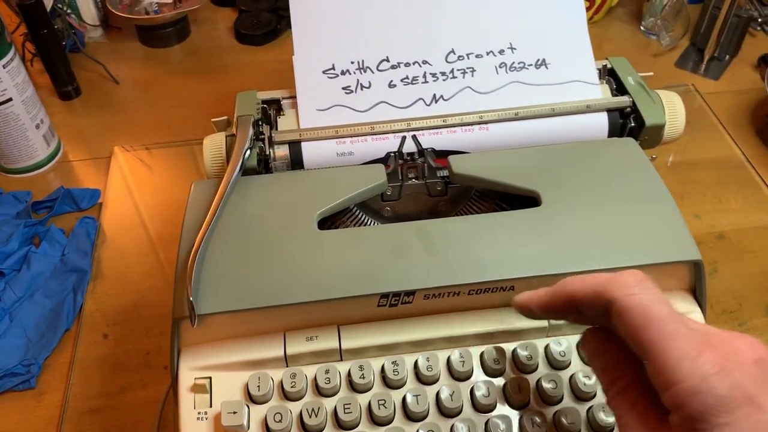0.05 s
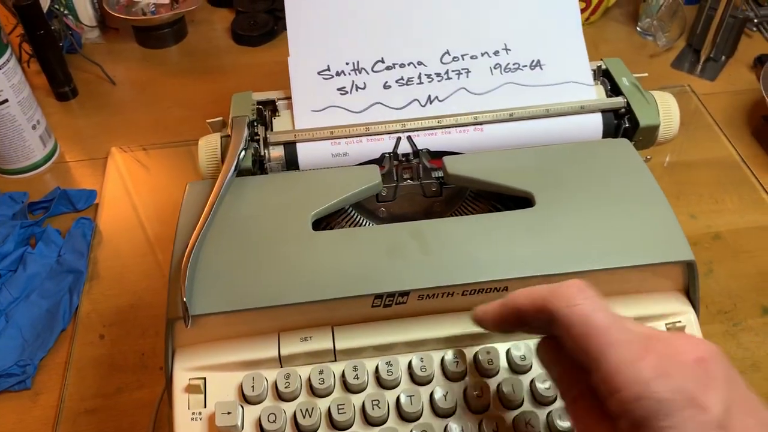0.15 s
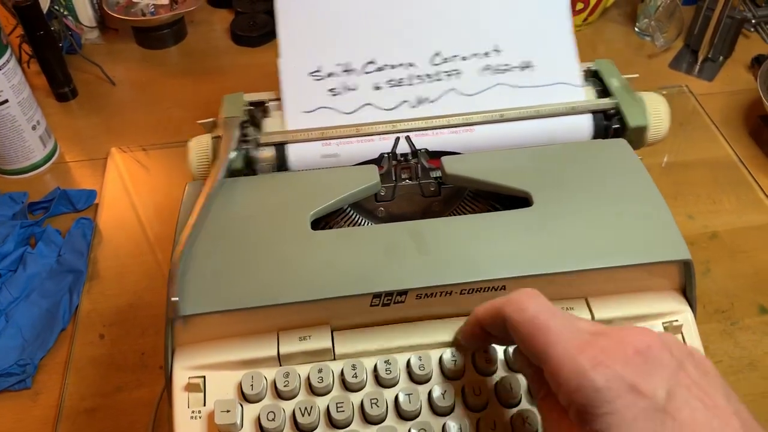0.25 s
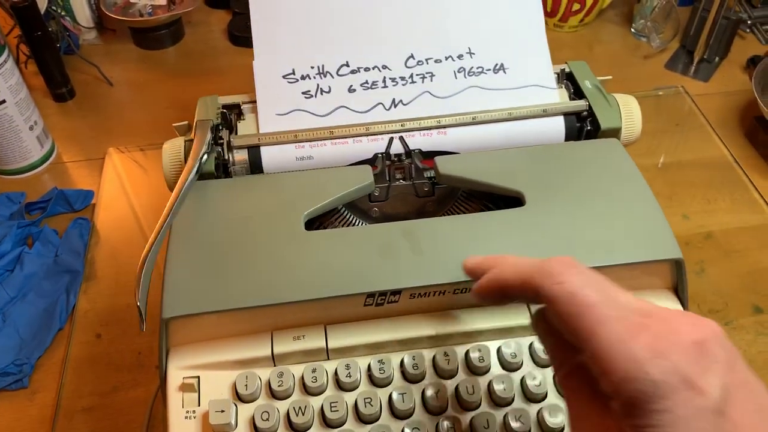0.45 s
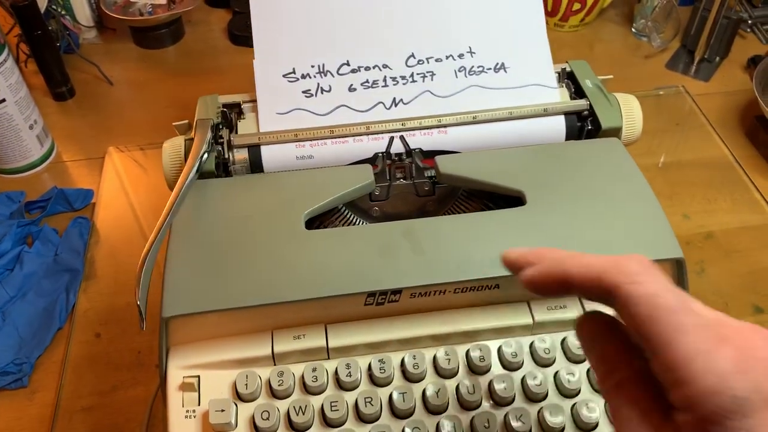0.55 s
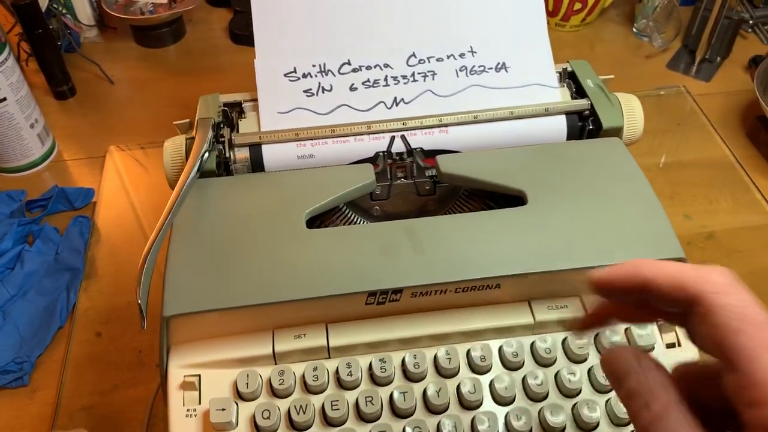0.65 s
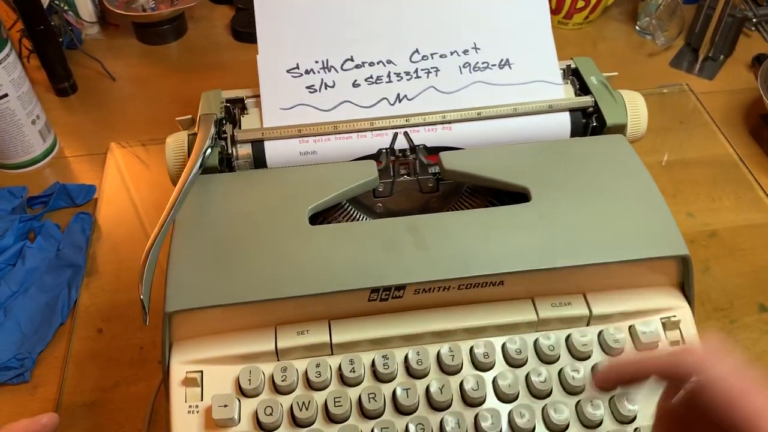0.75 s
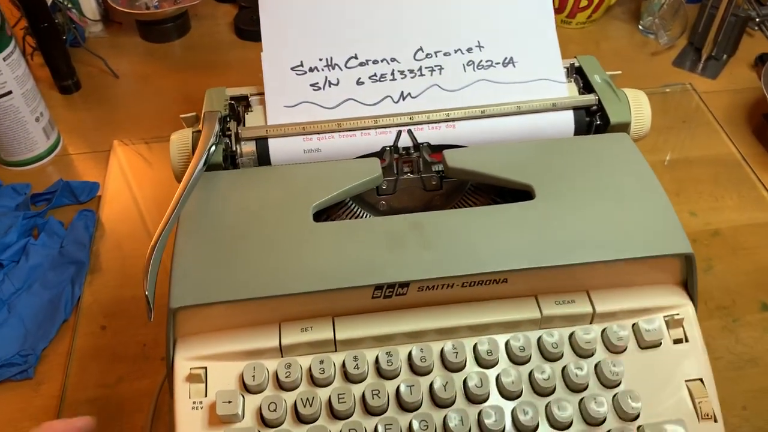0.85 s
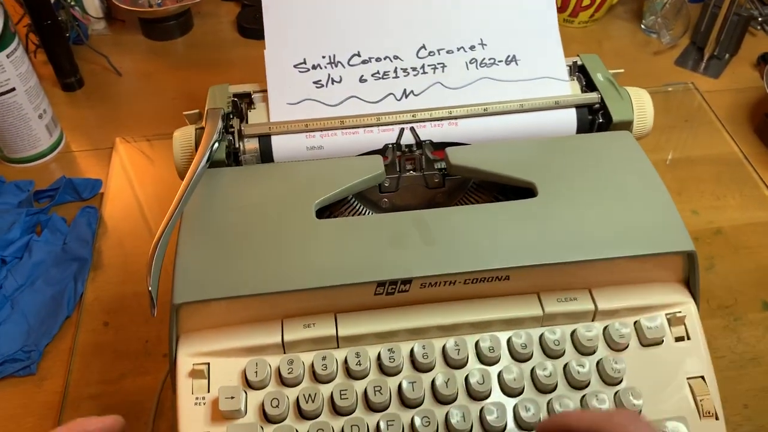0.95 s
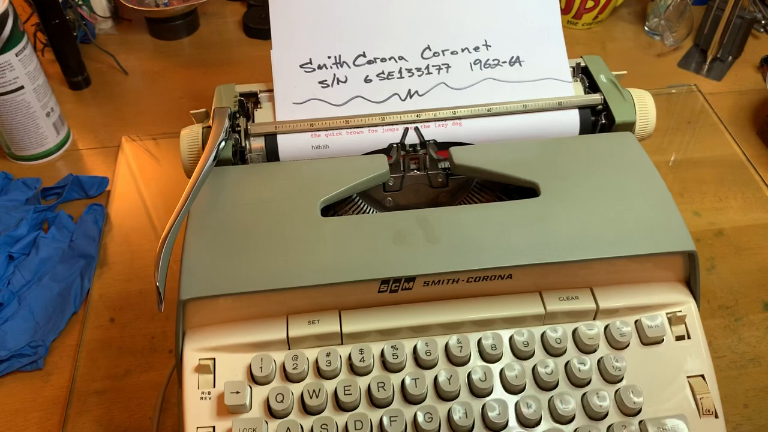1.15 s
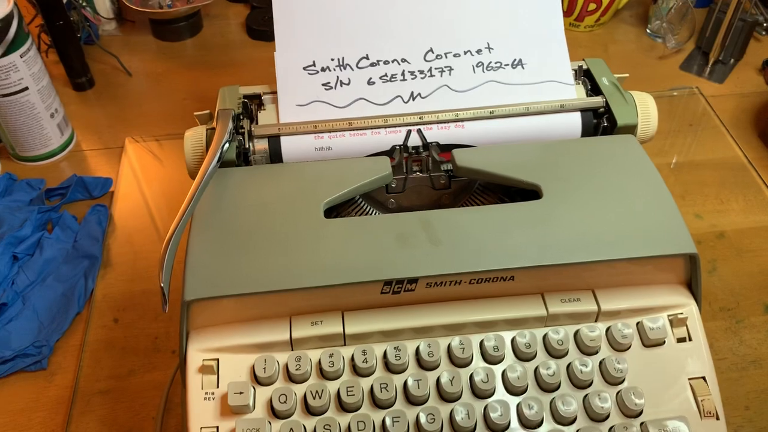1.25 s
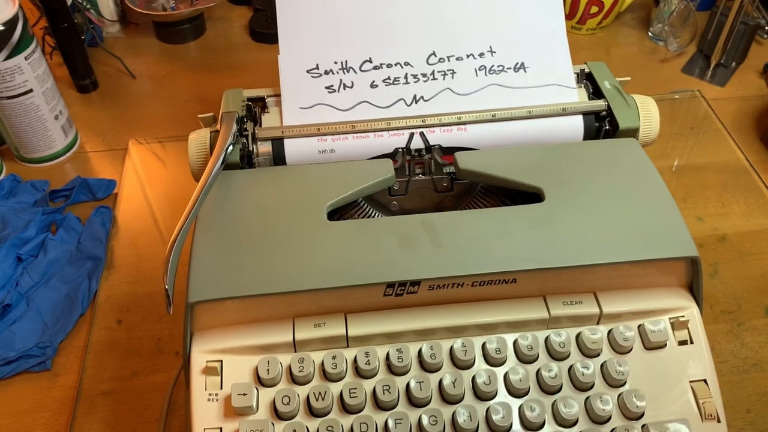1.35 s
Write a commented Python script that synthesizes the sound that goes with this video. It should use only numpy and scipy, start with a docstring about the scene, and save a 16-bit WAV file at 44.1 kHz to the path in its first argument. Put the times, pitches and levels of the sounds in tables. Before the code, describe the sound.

One electric typewriter keystroke clacks sharply over the motor's low idling hum.

```python
"""An electric typewriter idles on a workshop bench, close by: its motor hums and its drive rubs and hisses.
A hand bumps the keyboard and one key is struck. The type bar is flung at the platen and falls back;
each impact excites free vibration of the metal parts, and the room reverberates briefly. The carriage
then jumps one step, rattles and shakes the bench. Light key clicks follow, and the motor hums on."""
import sys
import numpy as np
from scipy import signal
from scipy.fft import rfft, irfft
from scipy.io import wavfile

SR = 44100
rng = np.random.default_rng(int(sys.argv[2]) if len(sys.argv) > 2 else 0)


def to_wav(sig):
    """Store sig (one row per channel, or 1-D mono) as 16-bit WAV at the path in sys.argv[1].

    Samples outside -1..1 are clipped; the rate is SR.
    """
    pcm = np.clip(np.atleast_2d(sig), -1, 1) * 32767
    pcm = np.round(pcm).astype(np.int16)
    wavfile.write(sys.argv[1], SR, pcm.T)  # frames by channels


N = 61739

# Motor hum and belt whine. Each row: frequency in Hz, level in dB, wavering share of the amplitude.
MOTOR_TONES = [(61.3, -69.5, 0.19), (119.95, -46.5, 0.14), (237, -66, 0.5), (293, -69, 0.29),
               (354, -69, 0.62), (519.8, -57.5, 0.45), (1028, -73, 0.89)]
# Housing resonances. Each row: centre in Hz, half width in Hz, level in dB.
HOUSING_BANDS = [(852, 45, -65), (994, 52, -71.5), (1187, 150, -67.5)]
# Spectra of the drive's rush and the belt's hiss. Each row: frequency in Hz, relative density in dB.
DRIVE_SPECTRUM = [(20, -30.5), (38, 0.5), (60, 7), (90, -3), (160, -5), (280, -6), (400, -4), (520, -1),
                  (680, -10.5), (900, -14.5), (1250, -19.5), (1700, -20), (2500, -30.5), (4000, -39.5),
                  (6000, -43.5), (10000, -45), (16000, -55)]
BELT_SPECTRUM = [(300, -23.5), (1000, 3), (2000, -7), (3600, -9), (6000, -32.5), (15000, -30)]
# Envelopes of the running sounds. Each row: time in seconds, gain in dB.
HUM_ENVELOPE = [(0, -4), (.3, 0.5), (.5, -5), (.62, 1.5), (.85, 1), (1.1, 0), (1.4, 1.5)]
DRIVE_ENVELOPE = [(0, -54.5), (.22, -53.5), (.5, -51), (.7, -54.5), (1.0, -53.5), (1.4, -55)]
BELT_ENVELOPE = [(0, -96), (.3, -76.5), (0.601, -69.5), (1.4, -70)]

# Impacts on each part. Each row: start in seconds, level in dB, factor on the decay time.
BUMP_HITS = [(0.2290, -38, 0.6), (1.1060, -53, 1.03)]
LINKAGE_HITS = [(0.2355, -28, 1.0), (0.2380, -20.5, 1.0), (0.2402, -20.5, 0.9), (0.2468, -27, 0.7)]
PAWL_HITS = [(0.2375, -23.5, 3.5), (0.3337, -16, 1.2), (0.3603, -19.5, 0.76), (0.6030, -60.5, 15),
             (0.7220, -67, 4)]
BAR_HITS = [(0.2385, -21.5, 0.92), (0.2467, -17.5, 0.6), (0.2490, -25.5, 0.97), (0.2752, -27.5, 0.74),
            (0.2980, -48, 0.77)]
LEVER_HITS = [(0.2430, -29.5, 0.99), (0.2755, -36, 0.36), (0.2950, -40.5, 2), (0.3590, -32, 0.68),
              (0.3950, -40, 0.44)]
CARRIAGE_HITS = [(0.3345, -24, 0.8), (0.3372, -18.5, 0.9), (0.3400, -22, 1.2), (0.3470, -24.5, 1.2),
                 (0.3605, -31, 0.81), (0.3720, -30, 1.3), (0.3830, -43.5, 1.6), (0.3930, -36, 1.2)]
KEY_HITS = [(0.6020, -49, 1.76), (0.6130, -54, 2.35), (0.6550, -64, 3.7)]
TICK_HITS = [(0.7220, -77, 3.6), (1.0850, -52, 0.76)]
# Spectra of those impacts. Each row: frequency in Hz, relative density in dB.
BUMP_SPECTRUM = [(30, -9.5), (65, 0), (130, -9.5), (240, -4), (400, -23.5), (900, -28.5), (2000, -9),
                 (4000, -30), (8000, -49.5)]
LINKAGE_SPECTRUM = [(80, -25.5), (250, -15), (600, 6.5), (1500, -7.5), (3500, -0.5), (5000, 5), (7500, -11),
                    (10000, -7), (13500, -6), (16000, -13)]
PAWL_SPECTRUM = [(500, -25), (4000, -22), (7000, -13), (9800, 3.5), (13500, 0.5), (16000, -10.5)]
BAR_SPECTRUM = [(60, -32), (140, -12), (250, -1.5), (490, 0.5), (640, -1), (850, 0.5), (1250, -0.5),
                (1650, -5), (2050, 1), (2700, 1), (3600, -12.5), (5000, -13.5), (8000, -18.5), (15000, -27)]
LEVER_SPECTRUM = [(500, -24), (2200, -17.5), (3200, -2.5), (4300, -1.5), (5500, -11), (8000, -8.5),
                  (15000, -31)]
CARRIAGE_SPECTRUM = [(60, -22), (130, -0.5), (250, 0.5), (350, -1.5), (500, 3.5), (660, -5), (880, 2),
                     (1100, -5.5), (1600, -5.5), (2000, -4), (3000, -6.5), (3750, -7), (4700, -8.5),
                     (7000, -7.5), (9000, -12), (10300, -5.5), (13000, -4), (16000, -16.5)]
KEY_SPECTRUM = [(100, 0), (500, -3), (950, 9), (1600, -2.5), (3000, 0), (5000, -8.5), (8000, -5.5),
                (14000, -15)]
TICK_SPECTRUM = [(200, -13), (2000, 10.5), (5000, -5), (8000, 14.5), (14000, 0)]
# Damping of parts and room. Each row: frequency in Hz, T60 (time to fall 60 dB) in seconds.
METAL_T60 = [(100, 0.36), (400, 0.11), (1500, 0.079), (4000, 0.018), (9000, 0.13), (15000, .035)]
CARRIAGE_T60 = [(100, 0.033), (400, 0.027), (1500, 0.094), (4000, 0.14), (9000, 0.068), (15000, 0.021)]
TICK_T60 = [(100, 0.034), (3000, 0.07), (15000, 0.0066)]
ROOM_T60 = [(100, 0.78), (500, 0.53), (1500, 0.3161), (3500, 0.4537), (7000, 0.26), (13000, 0.2646)]
# Strength of the reverberation. Each row: frequency in Hz, gain in dB.
ROOM_GAIN = [(100, -2.5), (400, -10), (640, -10), (1500, -5.5), (4000, -14.5), (8000, -6), (14000, -16.5)]
# Distinct modes of the parts. Each row: frequency in Hz, level relative to the hit in dB, T60 in seconds.
FRAME_RESONANCES = [(297, -19, .3), (474, -18, .28), (502, -18, .28), (566, -18, .24), (850, -18, .2),
                    (1100, -21, .3), (1208, -18, .3), (1502, -26, .24), (2012, -17, .28), (2181, -17, .28),
                    (2460, -20, .15), (2640, -17, .12), (3034, -20, .28), (3420, -26, .2), (3700, -26, .2)]
CARRIAGE_RESONANCES = [(228, -22, .3), (263, -22, .3), (401, -22, .3), (484, -17, .2), (1106, -24, .3),
                       (1335, -21, .26), (2089, -22, .22), (2611, -20, .22), (3245, -16, .2),
                       (3692, -19, .15), (4194, -16, .18), (4650, -22, .17), (5992, -22, .18),
                       (6627, -21, .2), (7090, -20, .1), (8080, -21, .13)]
KEY_RESONANCES = [(792, -12, .2), (952, -6, .16), (1166, -15, .22), (1394, -10, 0.3), (1915, -12, 0.39),
                  (2454, -17, 0.27), (3240, -23, 0.15)]
# Hard contacts. Each row: start in seconds, level in dB, frequency in Hz, time to peak in seconds.
SNAP_PULSES = [(0.244, -21.5, 1780, 0.0003), (0.2467, -8.5, 2474, 0.00021), (0.2472, -12.5, 5340, 0.00022),
               (0.2494, -23.5, 677, 0.0005), (0.2753, -36, 2166, 0.0024), (0.3355, -23.5, 3740, 0.0017),
               (0.3375, -26.5, 504, 0.006), (0.3603, -30, 4160, 0.0057), (0.603, -52, 945, 0.0057)]
# Rocking on the bench. Each row: start in seconds, level in dB, frequency in Hz.
BENCH_THUMPS = [(0.352, -27.5, 66.2), (0.443, -35.5, 62.4), (1.134, -51, 234.3)]

# Likeness at the two microphones. Each row: frequency in Hz, left-right correlation.
NEAR_COHERENCE = [(100, .98), (500, .92), (1200, .6), (3000, .15), (6500, .45), (8500, .8), (10000, .92),
                  (15000, .88)]
FAR_COHERENCE = [(100, 0.99), (300, .9), (600, 1), (1300, 0.33), (2500, 0.015), (7000, 0.33), (8700, 0.47),
                 (14000, 0.908)]
# Stereo balance. Each row: frequency in Hz, left minus right in dB.
MIC_BALANCE = [(50, -2.5), (250, -0.7), (550, 0.5), (900, 1.55), (2800, 1.5), (5700, -1.5), (9000, 0)]
# Microphone response. Each row: frequency in Hz, gain in dB.
MIC_RESPONSE = [(7000, -2), (8500, 1), (10500, -0.5), (12000, -2.5), (14300, 5.5), (15400, -3),
                (16300, -14.5)]

FLAT_SPECTRUM = [(1, 0)]
LN_1000 = np.log(1000)  # a fall of 60 dB in nepers
TIME, FREQS = np.arange(N) / SR, np.fft.rfftfreq(N, 1 / SR)


def amp(db):
    """Amplitude grows tenfold for every 20 dB."""
    return 10 ** (np.asarray(db) / 20)


def unit_rms(x):
    """Normalisation to unit mean power."""
    return x / np.sqrt(np.mean(x ** 2) + 1e-20)


def curve_at(points, hz):
    """Interpolation on a logarithmic frequency axis."""
    freqs, values = np.transpose(points)
    return np.interp(np.log(hz + 1), np.log(freqs + 1), values)


def envelope(points):
    """Interpolation in decibels: the gain moves exponentially between points."""
    return amp(np.interp(TIME, *np.transpose(points)))


def add(mix, start, sound):
    """Superposition: a sound adds to the mix from its start in seconds."""
    part = mix[:, max(round(start * SR), 0):][:, :sound.shape[-1]]
    part += sound[..., :part.shape[1]]


def noise_pair(coherence, spectrum, size):
    """Partial coherence: shared and opposed noise set the likeness of the two channels."""
    hz = np.fft.rfftfreq(size, 1 / SR)
    mid, side = rfft(rng.standard_normal((2, size)))
    same = np.clip(curve_at(coherence, hz), -1, 1)
    mid, side = mid * np.sqrt(1 + same), side * np.sqrt(1 - same)
    return unit_rms(irfft(np.array([mid + side, mid - side]) * amp(curve_at(spectrum, hz)), size))


def damp(x, decay, stretch=1):
    """Frequency-dependent damping: each band decays exponentially at its own rate."""
    size = x.shape[-1]
    hz, t = np.fft.rfftfreq(size, 1 / SR), np.arange(size) / SR
    centres, t60s = np.transpose(decay)
    spectrum, out = rfft(x), np.zeros_like(x)
    for weights, t60 in zip(np.eye(len(decay)), t60s):
        band = irfft(spectrum * curve_at(np.c_[centres, weights], hz), size)
        out += band * np.exp(-LN_1000 * t / (t60 * stretch))
    return out


def equalise(x, response):
    """Minimum-phase filtering: the Hilbert transform of the log gain gives a causal phase."""
    log_gain = np.log(amp(curve_at(response, abs(np.fft.fftfreq(4096, 1 / SR)))))
    taps = np.fft.ifft(np.exp(np.conj(signal.hilbert(log_gain)))).real
    return signal.fftconvolve(x, taps[None, :len(taps) // 2], axes=1)[:, :N]


def swell(depth_db, cutoff_hz=8):
    """Random amplitude modulation: low-passed noise moves a gain by depth_db rms."""
    slow = irfft(rfft(rng.standard_normal(N)) / (1 + (FREQS / cutoff_hz) ** 4), N)
    return amp(depth_db * unit_rms(slow))


def motor(waver_hz=16):
    """Narrow-band modulation makes mains hum and whine waver, over the rush of belts and roller."""
    hz, hum = np.fft.fftfreq(N, 1 / SR), np.zeros(N)
    for pitch, db, share in MOTOR_TONES:
        drift = np.fft.ifft(np.exp(2j * np.pi * rng.random(N)) / (1 + (hz / waver_hz) ** 2))
        swing = np.sqrt(1 - share ** 2) + share * drift / drift.std()
        hum += amp(db) * unit_rms((swing * np.exp(2j * np.pi * pitch * TIME)).real)
    rush = noise_pair(FAR_COHERENCE, DRIVE_SPECTRUM, N)
    return hum * envelope(HUM_ENVELOPE) + rush * envelope(DRIVE_ENVELOPE)


def housing():
    """Forced vibration: the drive rubs unevenly, and each housing resonance swells on its own."""
    out = np.zeros((2, N))
    for centre, width, db in HOUSING_BANDS:
        friction = noise_pair(FAR_COHERENCE, FLAT_SPECTRUM, N)
        band = irfft(rfft(friction) / (1 + ((FREQS - centre) / width) ** 4), N)
        out += amp(db) * unit_rms(band * swell(depth_db=4))
    return out * envelope(HUM_ENVELOPE)


def belt():
    """Modulated broadband noise: the belt's faint hiss flutters and grows after the stroke."""
    gain = swell(depth_db=1.8) * envelope(BELT_ENVELOPE)
    return gain * noise_pair(FAR_COHERENCE, BELT_SPECTRUM, N)


def impacts(hits, spectrum, decay, rise_s=0.0006):
    """Impact excitation: the modes of small parts lie so densely that they ring as decaying noise."""
    out, onset = np.zeros((2, N)), 1 - np.exp(-TIME / rise_s)
    for start, db, stretch in hits:
        ring = damp(noise_pair(NEAR_COHERENCE, spectrum, size=8192), decay, stretch)
        add(out, start, amp(db) * ring * onset[:ring.shape[1]])
    return out


def hand_bumps():
    """A soft impact excites mainly low frequencies: the hand bumps the keyboard."""
    return impacts(BUMP_HITS, BUMP_SPECTRUM, METAL_T60)


def room(x, delay_s=0.0065, rise_s=0.016):
    """Diffuse reverberation: convolution with a noise tail that lasts longest in the bass."""
    t = np.arange(SR) / SR
    tail = damp(noise_pair(FAR_COHERENCE, FLAT_SPECTRUM, size=SR), ROOM_T60)
    tail *= np.clip((t - delay_s) / rise_s, 0, 1)
    tail /= np.linalg.norm(tail[0])
    return equalise(signal.fftconvolve(x, tail, axes=1)[:, :N], ROOM_GAIN)


def type_bar():
    """Momentum transfer: the linkage catches and flings the bar, which hits the platen, then its rest."""
    linkage = impacts(LINKAGE_HITS, LINKAGE_SPECTRUM, METAL_T60)
    return linkage + impacts(BAR_HITS, BAR_SPECTRUM, METAL_T60)


def pawls():
    """Hard impacts excite high frequencies: pawls and latches click as they engage and rebound."""
    return impacts(PAWL_HITS, PAWL_SPECTRUM, TICK_T60)


def ringing(hits, modes):
    """Free vibration: each hit starts a part's distinct modes as damped sinusoids of random phase."""
    out, t = np.zeros((2, N)), np.arange(SR // 2) / SR
    for hz, mode_db, t60 in modes:
        # The phase gap between the channels has the coherence as its cosine.
        half_gap = np.arccos(np.clip(curve_at(NEAR_COHERENCE, hz), -1, 1)) * rng.choice([-.5, .5])
        phase = 2 * np.pi * hz * t + np.array([[half_gap], [-half_gap]])
        ring = np.exp(1j * phase - LN_1000 * t / t60)
        for (start, hit_db, _), turn in zip(hits, rng.random(len(hits))):
            add(out, start, amp(hit_db + mode_db) * (ring * np.exp(2j * np.pi * turn)).real)
    return out


def levers():
    """Repeated collision: loose levers rattle in the type basket."""
    return impacts(LEVER_HITS, LEVER_SPECTRUM, CARRIAGE_T60)


def snaps():
    """A brief pulse has a broad spectrum: type slug, carriage stop and key ping or knock on contact."""
    out, t = np.zeros((2, N)), np.arange(SR // 20) / SR
    for start, db, hz, peak_s in SNAP_PULSES:
        pulse = t / peak_s * np.exp(1 - t / peak_s)
        add(out, start, amp(db) * pulse * np.sin(2 * np.pi * hz * t))
    return out


def carriage():
    """Collision and rebound: the carriage hits its stop and rattles."""
    return impacts(CARRIAGE_HITS, CARRIAGE_SPECTRUM, CARRIAGE_T60)


def bench(rise_s=0.0095, t60=0.26):
    """Damped oscillation: the machine rocks on the bench in low, swelling thumps."""
    out, t = np.zeros((2, N)), np.arange(SR // 2) / SR
    shape = (1 - np.exp(-(t / rise_s) ** 2)) * np.exp(-LN_1000 * t / t60)
    for start, db, hz in BENCH_THUMPS:
        add(out, start, amp(db) * shape * np.sin(2 * np.pi * hz * t))
    return out


def keys():
    """Weak impacts: key and latch click as they reset, and tiny sharp ticks follow."""
    return impacts(KEY_HITS, KEY_SPECTRUM, CARRIAGE_T60) + impacts(TICK_HITS, TICK_SPECTRUM, TICK_T60)


def scene():
    """Superposition of the impacts, their reverberation, the ringing parts and the running drive."""
    hits = type_bar() + carriage() + pawls() + keys() + levers() + snaps() + hand_bumps()
    rings = ringing(BAR_HITS, FRAME_RESONANCES)
    rings += ringing(CARRIAGE_HITS, CARRIAGE_RESONANCES)
    rings += ringing(KEY_HITS, KEY_RESONANCES)
    return hits + room(hits) + rings + bench() + motor() + housing() + belt()


def record(dry):
    """Linear filtering: the microphones' response, low cut and balance, a lag of the left channel's treble, and
    the band limit."""
    low_cut_hz, band_limit_hz = 33, 16300
    lag_s, lag_from_hz = .000298, 3360
    hz = np.fft.rfftfreq(2 * N, 1 / SR)
    lean_db = curve_at(MIC_BALANCE, hz) / 2
    lag = np.exp(-2j * np.pi * lag_s * np.maximum(hz - lag_from_hz, 0))
    channels = np.array([amp(lean_db) * lag, amp(-lean_db)])
    low_cut = 1 - 1 / (1 + (hz / low_cut_hz) ** 4)
    heard = irfft(rfft(equalise(dry, MIC_RESPONSE), 2 * N) * low_cut * channels)[:, :N]
    low_pass = signal.firwin(511, band_limit_hz, window=("kaiser", 9), fs=SR)
    return signal.oaconvolve(heard, low_pass[None], "same")


dry = scene()
out = record(dry)
to_wav(out)
```